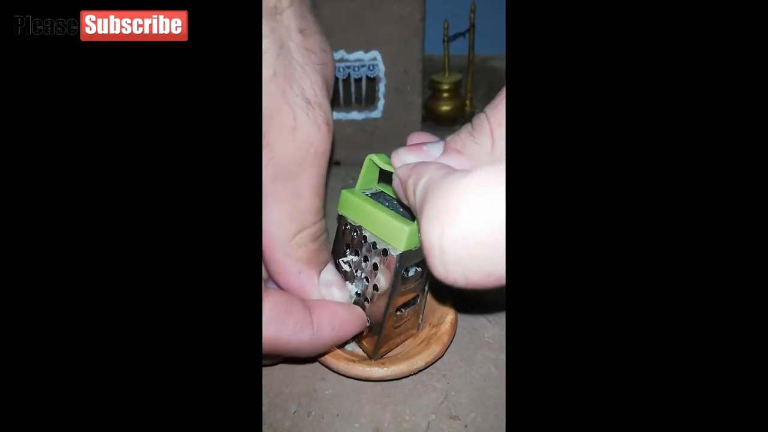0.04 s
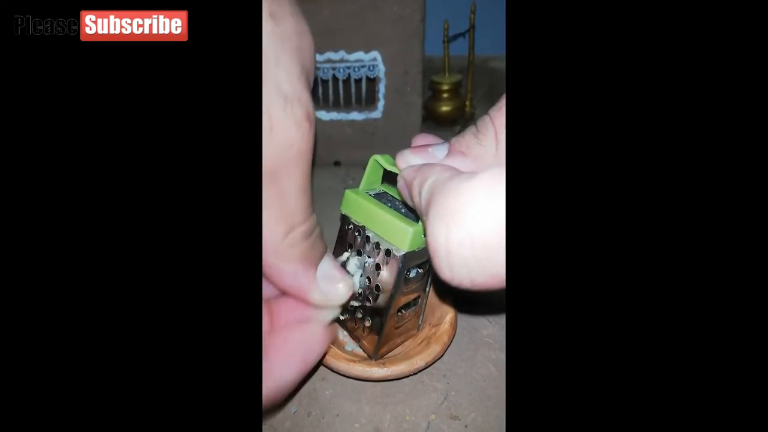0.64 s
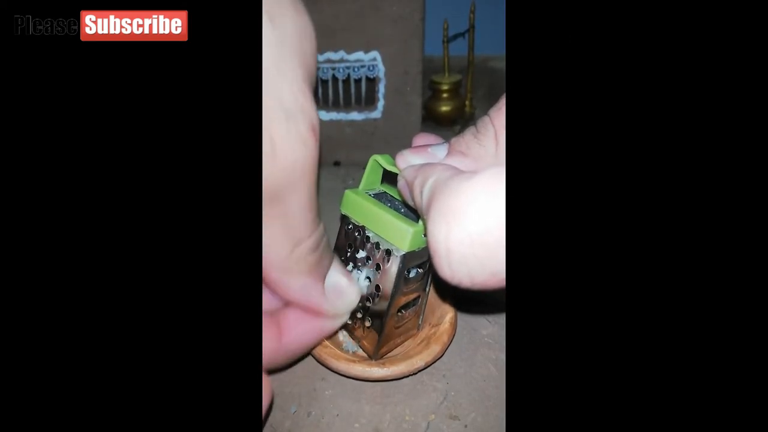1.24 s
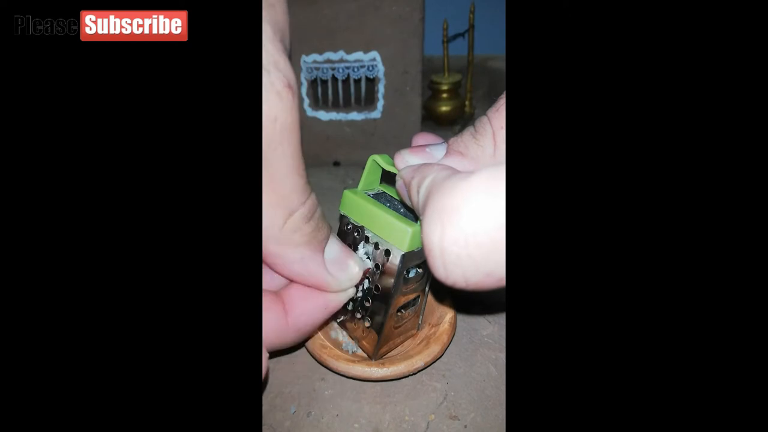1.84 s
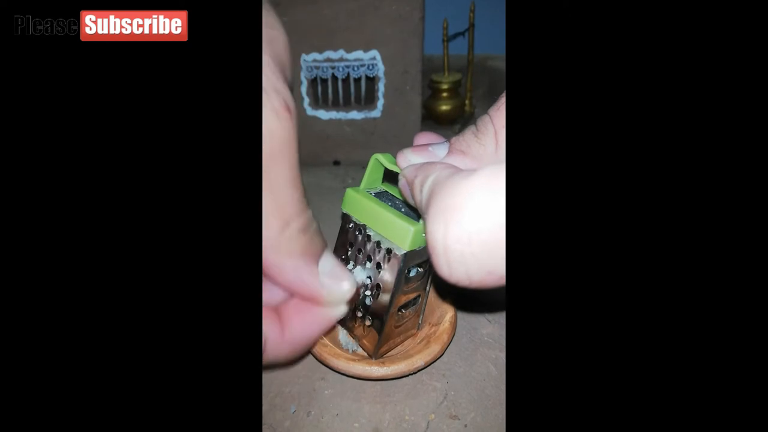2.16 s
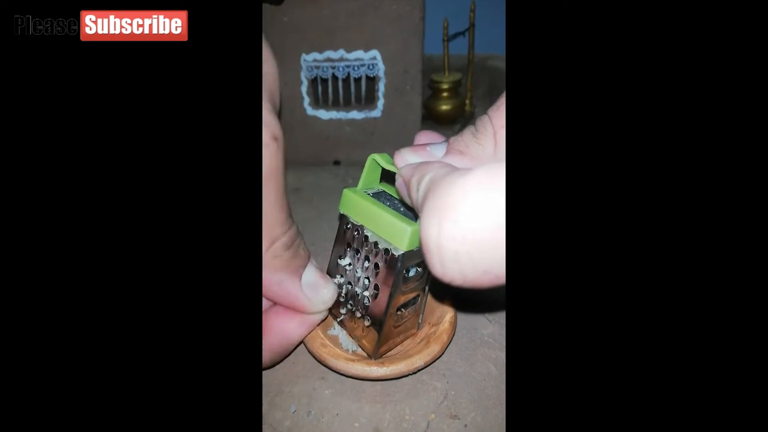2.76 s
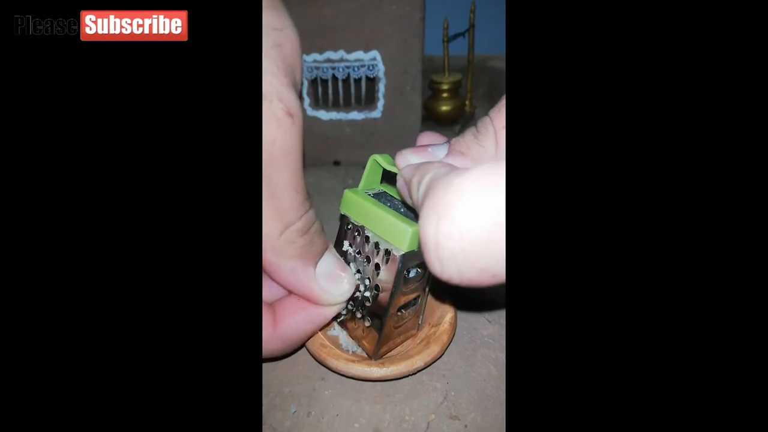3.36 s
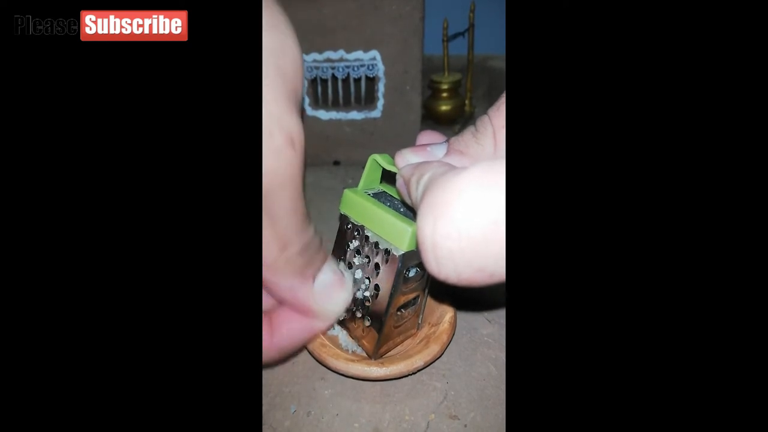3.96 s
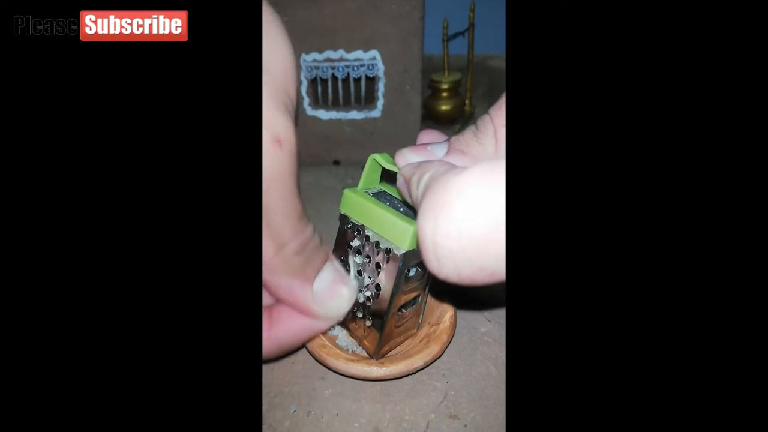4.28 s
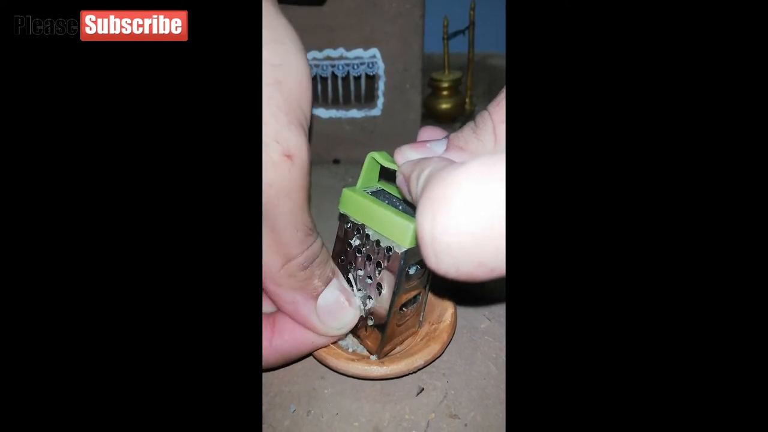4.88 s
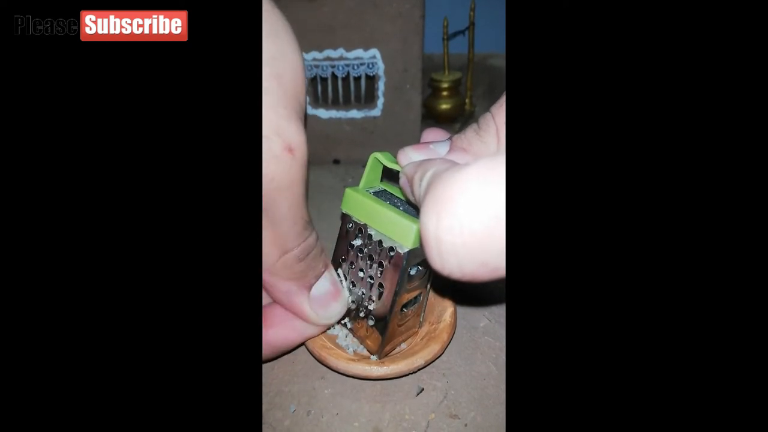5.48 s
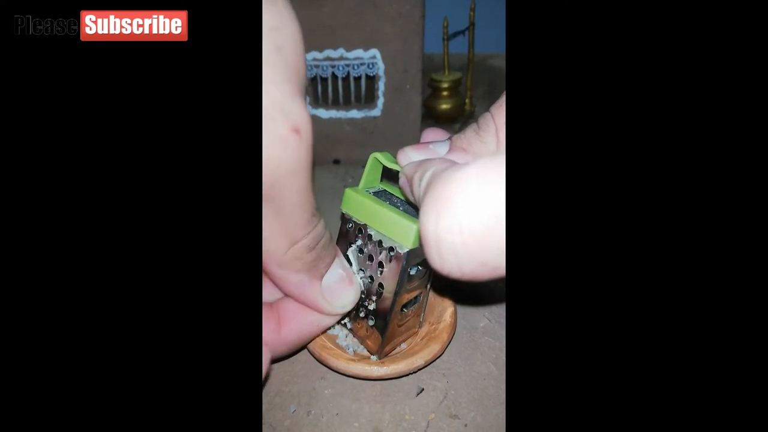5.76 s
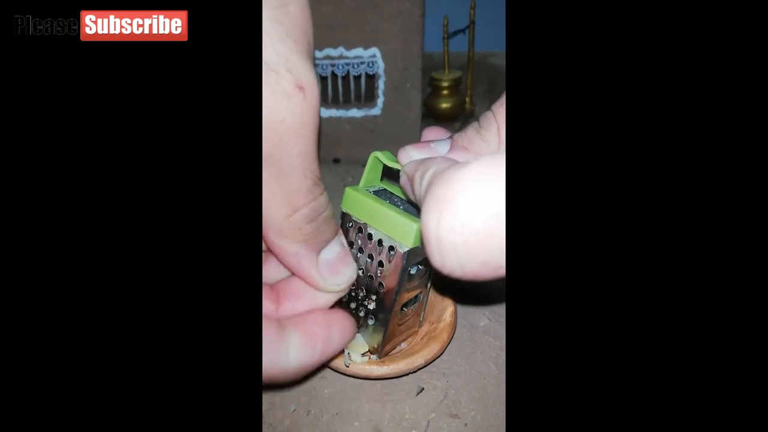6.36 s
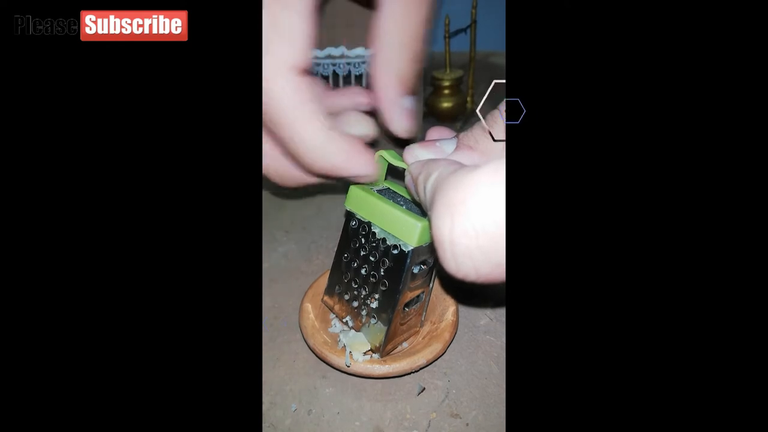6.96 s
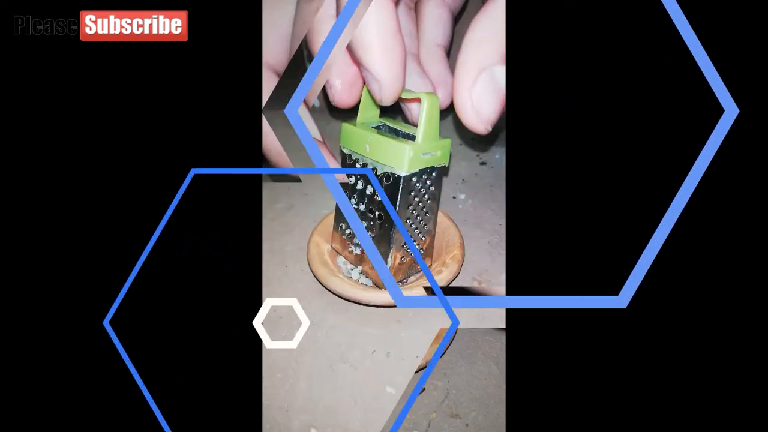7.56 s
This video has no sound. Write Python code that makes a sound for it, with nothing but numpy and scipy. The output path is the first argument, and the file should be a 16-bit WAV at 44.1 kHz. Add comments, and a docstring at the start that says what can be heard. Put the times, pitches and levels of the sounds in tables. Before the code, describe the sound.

Close, hollow scraping of food being grated by hand on a little metal box grater, dotted with ticks and light knocks.

```python
"""Grating food on a small steel grater

A piece of food is rubbed up and down a box grater that stands in a wooden dish on a table.
The teeth tear it in thousands of tiny slips, which shake the steel shell, the dish and the table.
The food taps the steel and snags on single teeth, the grater bumps on the dish, fingers slide up
the steel once and a plastic cap clacks. It is all heard from close by in a small room."""
import sys
import numpy as np
from scipy import signal
from scipy.fft import rfft, irfft
from scipy.io import wavfile
from scipy.ndimage import uniform_filter1d

SR = 44100
rng = np.random.default_rng(int(sys.argv[2]) if len(sys.argv) > 2 else 0)


def persist_wave(psi):
    """Save psi, clipped to +-1, as 16-bit WAV."""
    counts = np.round(np.clip(psi, -1, 1) * 32767).astype(np.int16)
    wavfile.write(sys.argv[1], SR, np.atleast_2d(counts).T)


N = 340452
TIME = np.arange(N) / SR
TEETH, SHELL, DISH, TABLE = range(4)   # the four parts that shake, as places in a list of levels

# The food lands on the steel with a dull tap. Each row: start in seconds, relative level in dB.
FOOD_TAPS = [(0.044, -34.5), (0.365, -32.5), (0.617, -31), (0.836, -27), (1.169, -31.5), (2.412, -32),
             (2.577, -25.5), (3.21, -26.5), (3.293, -32), (3.509, -33), (3.889, -22), (5.94, -22.5),
             (6.31, -20)]
# A tooth snags and snaps free. Each row: start in seconds, relative level in dB, extra dB for the teeth.
TOOTH_SNAGS = [(0.229, -34, 2), (1.291, -22, -8), (1.32, -26.5, -11.5), (1.352, -30, -8), (1.583, -17, -15),
               (1.703, -21.5, -11.5), (1.728, -26, -8), (1.957, -20, -9), (2.47, -23.5, -14),
               (2.777, -36, 1), (2.893, -30.5, -4), (3.131, -22.5, -8.5), (4.132, -25.5, -10.5),
               (4.201, -19, -4.5), (4.339, -30, -5), (4.666, -25.5, -7), (4.822, -32.5, 0.5),
               (4.901, -18, -5.5), (5.223, -19.5, -10), (5.543, -27, -10.5), (5.766, -33, 4),
               (6.595, -24, -10), (7.007, -22, -0.5), (7.395, -27, -13.5), (7.709, -25, -13)]
# The grater rocks and bumps on the dish.
# Each row: start in seconds, relative level in dB, extra dB for the thud in the table.
GRATER_BUMPS = [(0.192, -23, 3), (1.014, -14.5, 2.5), (1.429, -25, 3), (1.494, -19, 7.5), (1.883, -26.5, 9),
                (4.035, -29.5, 4.5), (5.099, -20.5, -8), (5.358, -28, 6.5), (5.443, -20.5, 4),
                (6.484, -16.5, 5), (6.76, -24.5, 6), (6.795, -19, 5.5)]


def teeth(tearing):
    """The cutting edges give a bright scrape and sharp ticks."""
    # The teeth's ringing tones. Each row: pitch in Hz, width in Hz, strength in dB, dB to the left.
    tones = [(2480, 360, 5, 8), (2970, 430, 2.5, 0), (3370, 125, 5, 9), (3630, 380, 0.5, -3.5),
             (4254, 150, 2, 1), (4415, 450, 1.5, 19), (5130, 680, 1, 8.5), (5510, 370, -1.5, 34),
             (6400, 310, -3.5, 23), (6700, 250, -1, 30), (7420, 700, -4.5, 31), (8850, 2700, -7, 16),
             (9480, 440, -1, 27), (10900, 690, -8.5, 16), (12900, 2900, -15.5, 18)]
    scrape = from_db(4.0) * rasp(tones, tearing, stroke_power(TEETH), steady_s=0.02)
    ticks = from_db(-0.5) * knocks(tones, TEETH, crunch_db=11.5, crunch_s=0.0033)
    return scattered(scrape + ticks, scatter_db=4.0)


def shell(tearing):
    """The steel box, damped by the hand, scrapes and clanks with a hollow, tinny voice."""
    # The box's ringing tones. Each row: pitch in Hz, width in Hz, strength in dB, dB to the left.
    tones = [(366, 74, -17.5, 1), (480.6, 25, 1.5, -3.5), (529.8, 37, 3, -6.5), (703, 42, -2, -32),
             (768, 48, -2, -8.5), (858, 52, -1.5, -52), (982, 46, 0, -16), (1044.5, 54, 2, -53),
             (1145, 55, -16, 8), (1225, 60, 0, -5), (1271, 26, -7.5, -7), (1503, 17, -16, -32),
             (1661, 59, -6, -17), (1814, 47, -9.5, 7), (2037, 140, -17.5, 11), (2110, 36, -10.5, -12),
             (2330, 123, -17, 2.5)]
    scrape = from_db(0.5) * rasp(tones, tearing, stroke_power(SHELL), steady_s=0.033)
    clanks = from_db(2.0) * knocks(tones, SHELL, crunch_db=12.5, crunch_s=0.006)
    return scattered(scrape, scatter_db=-9.0) + clanks


def dish(tearing):
    """The grater's rim judders on the wooden dish."""
    # The dish's ringing tones. Each row: pitch in Hz, width in Hz, strength in dB, dB to the left.
    tones = [(230.7, 22, 0, -0.5), (260.5, 28.4, 2.5, -0.5), (289.1, 17, -6, -2.5)]
    judder = from_db(1.83) * rasp(tones, tearing, stroke_power(DISH), steady_s=0.039)
    return judder + from_db(2.5) * knocks(tones, DISH, crunch_db=-6.5, crunch_s=0.0046)


def table(tearing):
    """The table top rumbles and thuds under the dish."""
    # The table's deep tones. Each row: pitch in Hz, width in Hz, strength in dB, dB to the left.
    tones = [(49, 9, -13.5, 0), (80.55, 5.6, 2, 0), (97.4, 5.4, -4.5, 0), (152.1, 10.6, -5, 0)]
    rumble = from_db(2.5) * rasp(tones, tearing, stroke_power(TABLE), steady_s=0.05)
    return rumble + from_db(-4.5) * knocks(tones, TABLE, crunch_db=-12.0, crunch_s=0.0046)


def slips(catch_db, catches_per_s, slips_per_s=5000, spread_db=3.5):
    """Fibres of the food tear at random, in clumps as each row of teeth catches."""
    torn = rng.random(N) < slips_per_s / SR
    sizes = from_db(spread_db * np.minimum(rng.exponential(1, N), 5))
    directions = rng.choice([-1, 1], N)
    catching = rms_one(np.interp(TIME * catches_per_s, np.arange(N), rng.standard_normal(N)))
    return torn * sizes * directions * from_db(catch_db * catching)


def stroke_power(part, rise_share=0.51):
    """The power the hand puts into one part: each stroke swells to its hardest push and eases off."""
    # Strokes of the food along the teeth. Each row: time of the hardest push in seconds,
    # length in seconds, force in dB, extra dB from leaning on the dish.
    strokes = [(0.01, 0.088, -39, 6.5), (0.132, 0.099, -26, 6.5), (0.644, 0.064, -24.5, -6),
               (0.936, 0.11, -42, 4.5), (1.033, .115, -34.5, 0), (1.25, .11, -26, -2.5),
               (1.428, .06, -32.5, 0.5), (1.487, 0.036, -33, 10), (1.656, 0.16, -32, -4),
               (1.832, .07, -27.5, 4), (2.022, .11, -26, -4.5), (2.138, 0.039, -32, 5.5),
               (2.485, 0.065, -31.5, 5.5), (2.583, 0.045, -24, 3.5), (2.828, .11, -29, -3),
               (2.927, 0.061, -30.5, 6.5), (3.009, 0.081, -29.5, 8.5), (3.045, 0.065, -18.5, -2.5),
               (3.2, 0.17, -29, 0.5), (3.326, 0.078, -27.5, 5.5), (3.579, 0.081, -24.5, -2),
               (3.68, 0.067, -26.5, 1), (3.737, 0.071, -20, 2.5), (3.929, .13, -28, -4.5),
               (4.069, 0.1, -22.5, 3), (4.252, 0.12, -27, -4), (4.41, 0.18, -28, 3), (4.6, 0.11, -28, .5),
               (4.706, 0.099, -30.5, -3), (4.79, 0.07, -21.5, -3), (4.943, 0.073, -28.5, -3),
               (5.081, .1, -25.5, -2), (5.263, 0.096, -29.5, 2), (5.418, 0.099, -25, 4),
               (5.588, 0.12, -26, -1), (5.764, 0.24, -32.5, -0.5), (5.991, 0.12, -30, -0.5),
               (6.133, 0.12, -27.5, 1), (6.334, 0.09, -27, -4), (6.428, 0.097, -34.5, 2.5),
               (6.47, 0.053, -21, -1), (6.658, 0.16, -28, -2.5), (6.785, 0.095, -30, 4),
               (6.992, 0.066, -24.5, 0.5), (7.088, 0.12, -34, 1.5), (7.142, 0.055, -29.5, 3.5),
               (7.336, 0.13, -32, .5), (7.449, 0.12, -24, 0.5), (7.634, 0.13, -26, -4)]
    power = np.zeros(N)
    for peak_s, length, force_db, lean_db in strokes:
        rise, fall = rise_share * length, (1 - rise_share) * length
        near = slice(max(int((peak_s - 2 * rise) * SR), 0), int((peak_s + 2 * fall) * SR))
        t = TIME[near] - peak_s
        from_peak = np.abs(t / np.where(t < 0, rise, fall))
        peak_db = force_db + stroke_shares(peak_s, lean_db)[part]
        power[near] += from_db(peak_db - 20 * from_peak ** 1.95) ** 2
    return power * holding_back() ** 2


def stroke_shares(at_s, lean_db, usual_bite_db=-16):
    """How a stroke's force divides among teeth, shell, dish and table, in dB."""
    # How deep the teeth bite. Each row: time in seconds, the teeth's share against the shell's in dB.
    bites = [(0.15, -17.5), (0.65, -28.5), (0.95, -23), (1.35, -14), (2.5, -18.5), (2.85, -16),
             (3.75, -17.5), (5.1, -13.5), (6.05, -17), (7.1, -14.5)]
    bite_db = np.interp(at_s, *np.transpose(bites))
    # Leaning and a deeper bite both drag the table along.
    drag_db = -2.5 + 0.66 * lean_db + 0.84 * (bite_db - usual_bite_db)
    return np.array([bite_db, 0, lean_db, drag_db])


def holding_back(stick_s=0.023, stall_s=0.052, dip_db=-3):
    """The scrape dips as the food sticks before a tap or snag, and as a bump stalls the hand."""
    db = np.zeros(N)
    for start, *_ in FOOD_TAPS + TOOTH_SNAGS:
        db[max(int((start - stick_s) * SR), 0):int(start * SR)] = dip_db
    for start, *_ in GRATER_BUMPS:
        db[int(start * SR):int((start + stall_s) * SR)] = dip_db
    return from_db(db)


def rasp(tones, tearing, power, steady_s):
    """The slips make a part ring, and the hand's push sets how loud."""
    ringing = ring(tones, np.zeros(N), tearing)
    own_power = uniform_filter1d(np.mean(ringing ** 2, axis=0), max(int(steady_s * SR), 1))
    mean_width_hz = np.mean(np.array(tones)[:, 1])
    linger = np.exp(-2 * np.pi * mean_width_hz / SR)   # share of the energy left after one sample
    stored_power = signal.lfilter([1 - linger], [1, -linger], power + 1e-18)
    return ringing * np.sqrt(stored_power / (np.abs(own_power) + 1e-9))


def knocks(tones, part, crunch_db, crunch_s, size=1024):
    """Each knock is one blow, then a few milliseconds of crunch as the food breaks."""
    blows, crunch = np.zeros(N + size), np.zeros(N + size)
    fading = unit_energy(np.exp(-(TIME[:size] / crunch_s) ** 2))
    for start_s, extra_crunch_db, levels in knock_levels():
        breaking = from_db(crunch_db + extra_crunch_db)
        height = from_db(levels[part]) * np.sqrt(SR / 100 / (1 + breaking ** 2))
        start = int(start_s * SR)
        blows[start] += height
        crunch[start:start + size] += height * breaking * fading
    return ring(tones, blows[:N], crunch[:N])


def knock_levels():
    """List each knock's start in seconds, extra crunch in dB and levels for the four parts in dB."""
    # What a tap passes to the teeth, shell, dish and table, in dB.
    tap_shares = (-31, 0, -9.5, -13.5)
    taps = [(s, -3.5, db + np.array(tap_shares)) for s, db in FOOD_TAPS]
    snags = [(s, 0, db + np.array([sharp_db, 0, -10.5, -5.5])) for s, db, sharp_db in TOOTH_SNAGS]
    bumps = [(s, -4.5, db + np.array([-14.5, 0, -2, thud_db])) for s, db, thud_db in GRATER_BUMPS]
    return taps + snags + bumps


def ring(tones, blows, crunch, contact_spread_db=3):
    """A blow starts all of a part's tones together; each tiny slip kicks each tone by a random amount."""
    hit, slipped = np.flatnonzero(blows), np.flatnonzero(crunch)
    shares = np.array([from_db(db) ** 2 * width for _, width, db, _ in tones])
    ringing = np.zeros((2, N))
    for (hz, width, _, left_db), share in zip(tones, shares / shares.sum()):
        force = np.full(N, 1e-18)
        # Where a blow lands changes how strongly this tone answers.
        force[hit] += blows[hit] * from_db(contact_spread_db * rng.standard_normal(len(hit)))
        force[slipped] += crunch[slipped] * rng.standard_normal(len(slipped)) * travelling(slipped)
        decay = np.exp(-np.pi * width / SR)   # a wider tone dies sooner
        angle = 2 * np.pi * hz / SR
        gain = np.sin(angle) * np.sqrt(2 * share * (1 - decay ** 2))
        swing = signal.lfilter([0, gain], [1, -2 * decay * np.cos(angle), decay ** 2], force)
        ringing += rms_one(pan(left_db)) * swing
    # A small part gives off little sound below its lowest tone.
    low_cut = signal.butter(2, 0.72 * tones[0][0], "high", fs=SR, output="sos")
    return signal.sosfilt(low_cut, ringing)


def travelling(samples, spread_db=2.5, places_per_s=14):
    """A tone grows and shrinks as the food travels over the grater's face."""
    places = rng.standard_normal(4096)
    wander = np.interp(samples / SR * places_per_s, np.arange(len(places)), places)
    return rms_one(from_db(spread_db * wander))


def panel_pings(hz=1674, fade_s=0.083):
    """A catch high on the grater's face leaves its free panel singing briefly."""
    # The catches. Each row: start in seconds, relative level in dB.
    catches = [(1.956, -28), (4.2, -22), (4.9, -27.5), (5.223, -23), (5.562, -25), (6.31, -42)]
    return sum(dying_sine(start, hz, db, fade_s) for start, db in catches) * pan(left_db=-10)


def cap_clack(start_s=7.009, level_db=-14.5):
    """The plastic cap gives a short, hard clack as the grip shifts."""
    # The cap's tones. Each row: pitch in Hz, relative level in dB, seconds to fade by 60 dB.
    tones = [(1023, -22, 0.098), (1260, 4, 0.032), (1780, -15, 0.073), (2105, -20, 0.2), (2400, -21, 0.038),
             (3677, -15, 0.033)]
    return sum((-1) ** k * dying_sine(start_s, hz, level_db + db, fade_s)
               for k, (hz, db, fade_s) in enumerate(tones))


def finger_slide(peak_s=0.48, swell_s=0.14, level_db=-49):
    """Fingers slide softly back up the steel with a hiss that swells and fades."""
    # The colour of the hiss. Each row: frequency in Hz, relative level in dB.
    colour = [(1180, -50), (2000, -20), (2470, -12), (6400, -1.5), (9760, -3.5), (11500, -17), (15000, -14)]
    spectrum = colour_gains(colour) * rfft(rng.standard_normal((2, N)))
    hiss = rms_one(irfft(spectrum, N) * pan(left_db=16))
    return from_db(level_db) * hiss * np.exp(-((TIME - peak_s) / swell_s) ** 2)


def scattered(sound, scatter_db):
    """Add quick reflections off the hands, the dish and the inside of the box."""
    share = from_db(scatter_db)
    reflections = through(sound, echoes(fade_s=0.032, size=2048))
    return (sound + share * reflections) / np.sqrt(1 + share ** 2)


def room_echo(bright, tinny, low, size=24000):
    """The small room answers, most clearly to the upper ring of the steel."""
    upper_band = signal.butter(2, [1200, 2800], "band", fs=SR, output="sos")
    upper_ring = signal.sosfilt(upper_band, tinny.mean(axis=0))
    steel = from_db(-11.0) * bright + from_db(-16.5) * tinny
    steel_tail = through(steel, echoes(fade_s=0.33, size=size))
    upper_tail = from_db(-7.0) * through(upper_ring, echoes(fade_s=0.39, size=size))
    # Long waves reach both sides alike, so they share one set of echoes.
    low_tail = from_db(-13.5) * through(low, echoes(fade_s=0.38, size=size)[0])
    return steel_tail + upper_tail + low_tail


def background(level_db=-51, alike_below_hz=310):
    """A steady rumble, alike on both sides, lies under a faint hiss."""
    # The colour of the room's noise. Each row: frequency in Hz, relative level in dB.
    colour = [(15, -42), (25, 8.5), (120, 1), (270, -7.5), (607, -14.5), (1040, -11.5), (2690, -16),
              (3080, -17.5), (3920, -19), (6210, -21), (8140, -22.5), (9570, -23.5), (16000, -32.5)]
    alike = 1 / (1 + (frequencies() / alike_below_hz) ** 2)
    white = rfft(rng.standard_normal((3, N)))   # left, right and common to both
    mixed = np.sqrt(alike) * white[2] + np.sqrt(1 - alike) * white[:2] * pan(left_db=0.5)
    return from_db(level_db) * rms_one(irfft(colour_gains(colour) * mixed, N))


def echoes(fade_s, size):
    """Dense reflections, different on each side, that fall by 60 dB in fade_s."""
    return unit_energy(rng.standard_normal((2, size)) * from_db(-60 * TIME[:size] / fade_s))


def through(sound, reflections):
    """Play a sound through a pattern of reflections, one side at a time."""
    return signal.oaconvolve(np.atleast_2d(sound), np.atleast_2d(reflections), axes=1)[:, :N]


def dying_sine(start_s, hz, db, fade_s):
    """One struck tone that falls by 60 dB in fade_s."""
    t = np.maximum(TIME - start_s, 0)
    return from_db(db - 60 * np.minimum(t / fade_s, 5)) * np.sin(2 * np.pi * hz * t)


def colour_gains(colour):
    """Join rows of Hz and dB into a gain for every frequency."""
    hz, db = np.transpose(colour)
    return from_db(np.interp(np.log(frequencies()), np.log(hz), db))


def frequencies():
    """The frequencies of the whole sound's spectrum, kept at 1 Hz or more."""
    return np.maximum(np.arange(N // 2 + 1) * SR / N, 1)


def pan(left_db):
    """Left and right gains; the left is louder by left_db."""
    return from_db([[left_db / 2], [-left_db / 2]])


def from_db(db):
    """Turn decibels into a gain."""
    return 10 ** (np.asarray(db) / 20)


def rms_one(x):
    """Scale to an average power of 1."""
    return x / np.sqrt(np.mean(x ** 2) + 1e-20)


def unit_energy(x):
    """Scale to a total energy of 1, averaged over the sides."""
    return rms_one(x) / np.sqrt(x.shape[-1])


def scene(left_lag_s=0.00061):
    """One stream of slips drives all four parts, and the room sounds around them."""
    tearing = slips(catch_db=3.8, catches_per_s=220)
    bright = teeth(tearing) + finger_slide()
    tinny = shell(tearing) + panel_pings() + cap_clack()
    low = dish(tearing) + table(tearing)
    left, right = bright + tinny + low
    late_left = np.interp(TIME - left_lag_s, TIME, left, left=0)   # this microphone is farther off
    return np.array([late_left, right]) + room_echo(bright, tinny, low) + background()


def record(dry, cutoff_hz=15900):
    """Clip the peaks at full scale and cut the highest treble."""
    treble_cut = signal.ellip(10, 0.1, 80, cutoff_hz, fs=SR, output="sos")
    return signal.sosfilt(treble_cut, np.clip(dry, -1, 1))


dry = scene()
out = record(dry)
persist_wave(out)
```